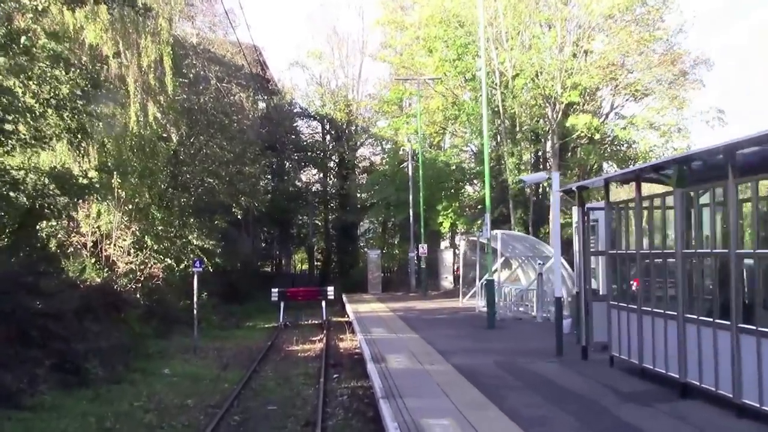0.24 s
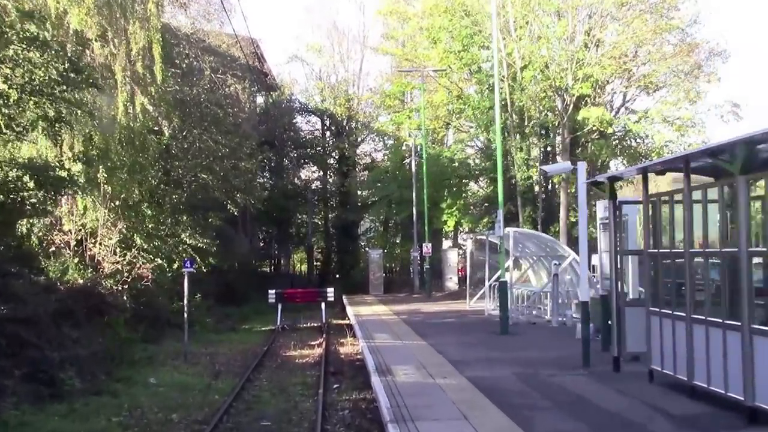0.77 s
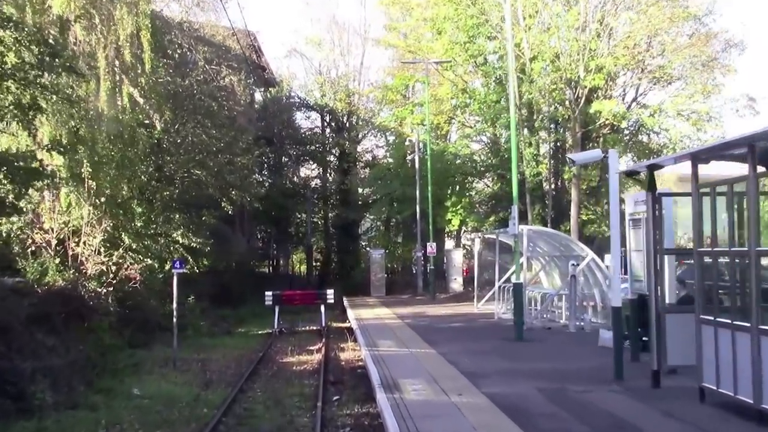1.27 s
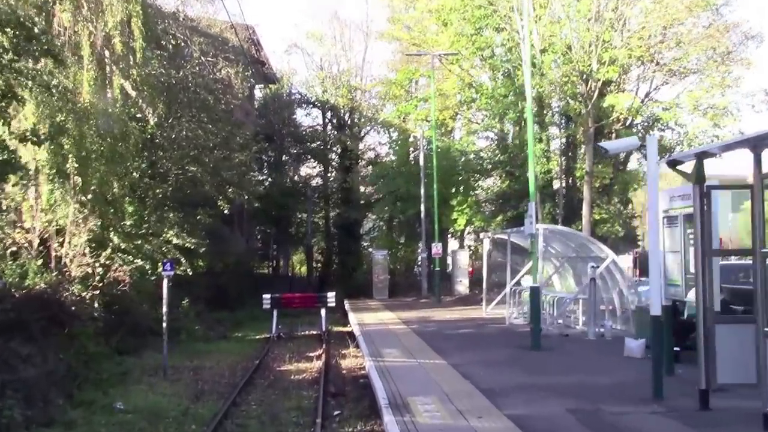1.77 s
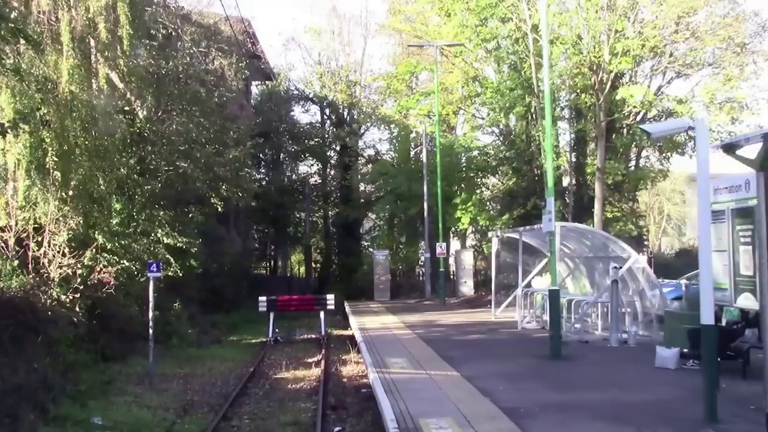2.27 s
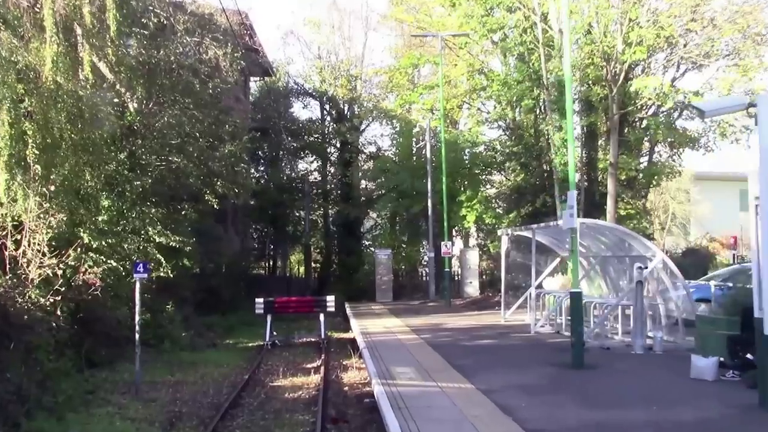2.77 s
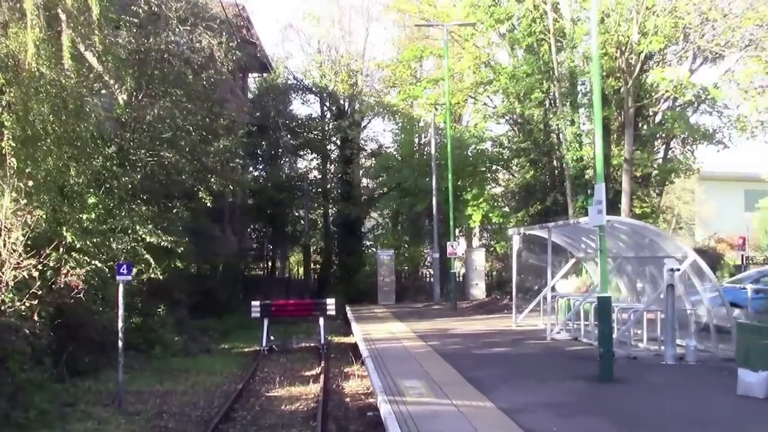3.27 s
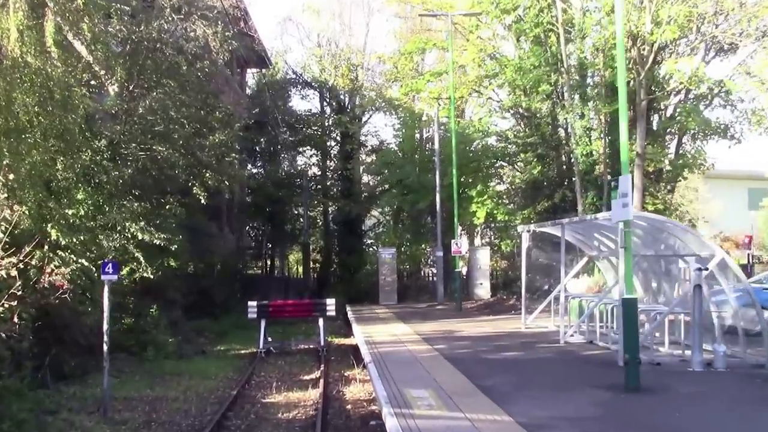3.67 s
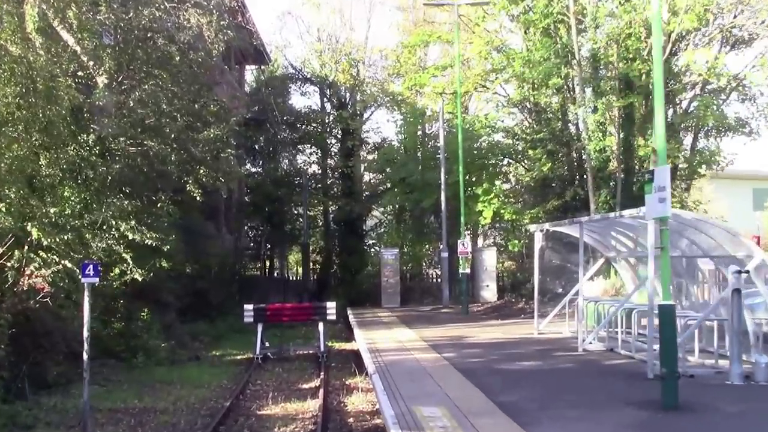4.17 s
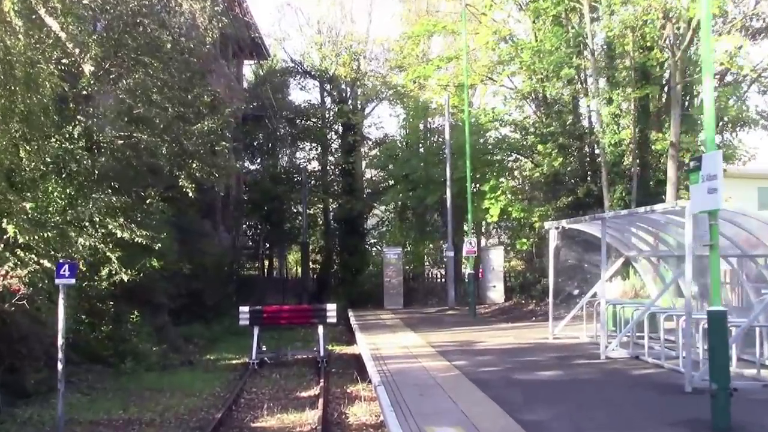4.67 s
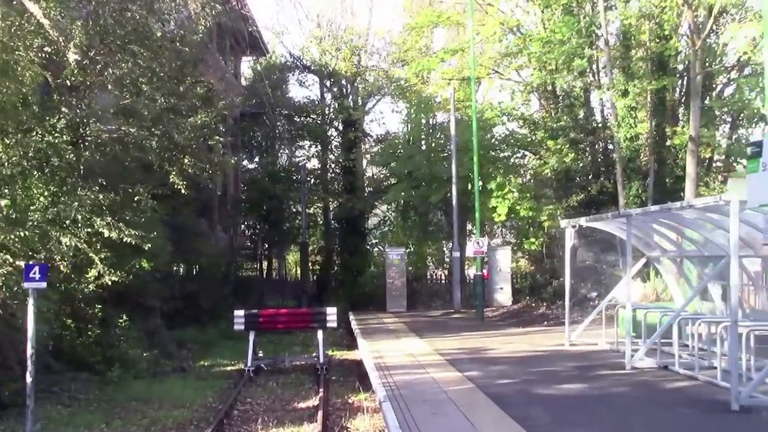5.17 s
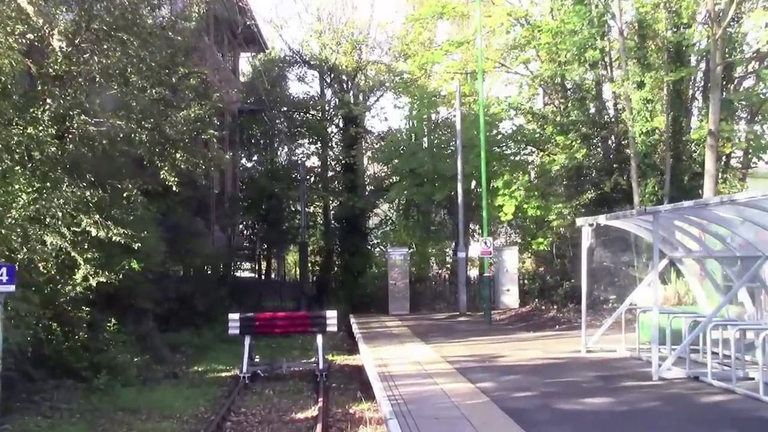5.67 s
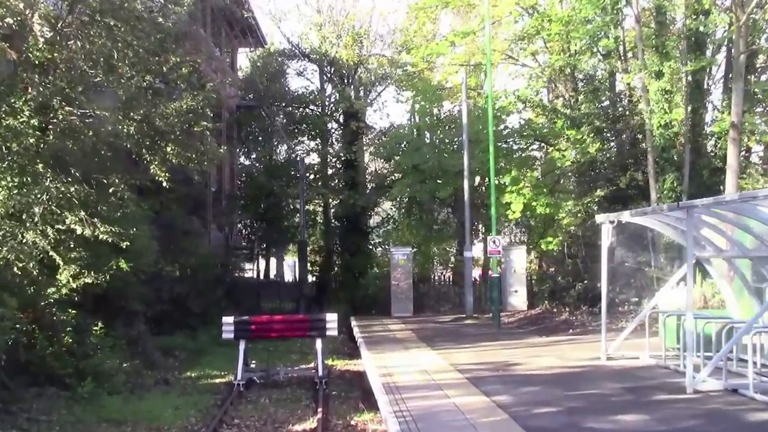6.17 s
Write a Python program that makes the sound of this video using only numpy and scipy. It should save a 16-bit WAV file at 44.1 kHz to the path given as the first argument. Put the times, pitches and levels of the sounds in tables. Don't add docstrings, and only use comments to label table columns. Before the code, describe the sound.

Inside the cab of an electric train creeping toward a halt beside a platform, captured in close, fairly centred stereo. Throughout, two motor-generators under the floor give a strong low hum around 200 hertz with fainter higher tones, above a lumpy bogie rumble, floor drumming and soft fan hiss. A thin, breathy brake whistle near 3 kilohertz comes and goes in short grips. A faint joint passes at 0.5 seconds; a tiny squeak follows around 0.8. From 1.2 the hum begins slowly beating; a low scrape passes near 1.4 and joints knock at 1.6 and 1.9. Around 2.1 the whistle sinks in pitch. The hardest thuds land at 2.9 and 3.8, dull and clustered. Then joints grow sparse, with one soft knock at 5.0. Small trim squeaks pass near 5.1 and 6.1, and an air valve puffs briefly at 5.7 beside a faint joint. Hum and whistle continue to the end, about 6.4.

```python
import sys
import numpy as np
from scipy import signal
from scipy.fft import rfft, irfft, next_fast_len
from scipy.io import wavfile
from scipy.ndimage import map_coordinates

SR = 44100
rng = np.random.default_rng(int(sys.argv[2]) if len(sys.argv) > 2 else 0)


def transcribe(u):
    v = np.clip(np.atleast_2d(u).T, -1, 1)
    q = np.round(v * 32767).astype(np.int16)
    wavfile.write(sys.argv[1], SR, q)


def ratio(d):
    e = np.asarray(d, float) / 20
    return 10 ** e


N = 284003


def unit(x):
    return x / np.sqrt(np.mean(x ** 2) + 1e-20)


def along(points, hz):
    f, v = np.transpose(points)
    return np.interp(np.log(hz + 1), np.log(f + 1), v)


def spectrum(points):
    return lambda hz: ratio(along(points, hz))


def band(c_hz, w_hz):
    return lambda hz: (hz * w_hz) ** 2 / ((c_hz ** 2 - hz ** 2) ** 2 + (hz * w_hz) ** 2)


def curve(rows):
    s, value = np.transpose(rows)
    return np.interp(np.arange(N) / SR, s, value)


def wobble(rate_hz):
    knots = rng.standard_normal(int(N * rate_hz / SR) + 4)
    return map_coordinates(knots, [np.arange(N) * rate_hz / SR])


def filtered(x, response):
    m = next_fast_len(x.shape[-1] + 8192)
    return irfft(rfft(x, m) * response(np.fft.rfftfreq(m, 1 / SR)), m)[..., :x.shape[-1]]


# (frequency [Hz], likeness [0-1])
LIKENESS = [(30, 1), (250, 1), (600, 0.98), (1100, 0.9), (3500, 0.8), (6000, 0.8), (12000, 0.84)]


def rush(gain, length=N):
    def turn(hz):
        return np.arccos(np.clip(along(LIKENESS, hz), -1, 1)) / 2

    def mid_side(hz):
        return gain(hz) * [np.cos(turn(hz)), np.sin(turn(hz))]

    mid, side = filtered(rng.standard_normal((2, length)), mid_side)
    return unit(np.array([mid + side, mid - side]))


def add(track, s, burst):
    part = track[:, round(s * SR):][:, :burst.shape[1]]
    part += burst[:, :part.shape[1]]


def blow(rise_s, t60_s):
    t = np.arange(SR // 2) / SR
    return (1 - np.exp(-t / rise_s)) * ratio(-60 * t / t60_s)


PANEL_ORDERS = (4, 8, 12, 20, 24, 46)
# (level [dB], twin's share [0-1], twin's offset [deg])
PANEL_TWIN = [(-18.5, 0.61, 198), (-42, .48, 15.5), (-44, .613, 262), (-54.5, 0.6, 279), (-51.5, 0.2, 120),
              (-57.5, 0.4, 241)]
# (left-right [dB], left lead [rad])
PANEL_SKEW = [(0, 0.022), (-1, 0.024), (1.5, 0.068), (-1.7, 0.13), (0.5, 0.083), (0.5, .15)]
# (multiple, level [dB])
STEADY_ORDERS = [(5, -47.5), (10, -53), (15, -52), (16, -58), (25, -67.5), (28, -65.5), (31, -68),
                 (32, -76), (34, -75.5), (35, -68), (36, -65.5), (40, -66), (41, -64), (44, -69.5),
                 (45, -61.5), (50, -66.5), (54, -74), (56, -69.5), (58, -70), (66, -68.5)]
# (time [s], shaft angle ahead [deg])
TWIN_SLIP = [(0.0, -7.6), (0.4, 3.3), (0.8, 0.0), (1.2, 2.9), (1.6, 18.9), (2.0, 35.3), (2.5, 49.4),
             (3.0, 55.5), (3.6, 64.6), (4.2, 77.4), (4.75, 85.3), (5.3, 99.3), (5.8, 105.5), (6.44, 106.1)]


def motor_generators():
    shaft_hz, hunt_hz = 51.497, .015
    angle = 2 * np.pi * np.cumsum(shaft_hz + hunt_hz * wobble(1.5)) / SR
    slip_deg = curve(TWIN_SLIP)
    tones = []
    for k, (db, share, deg), skew in zip(PANEL_ORDERS, PANEL_TWIN, PANEL_SKEW):
        twin = share * np.exp(1j * np.radians(k * slip_deg + deg))
        tones.append((k, ratio(db) * (1 + twin), skew))
    for k, db in STEADY_ORDERS:
        tones.append((round(k), ratio(db + 0.85 * wobble(2.984)), rng.normal(0, [.9, .12])))
    out = np.zeros((2, N))
    sides = np.array([[.5], [-.5]])
    for k, size, (lean_db, lead_rad) in tones:
        tone = np.sqrt(2) * size * np.exp(1j * (k * angle + rng.uniform(0, 2 * np.pi)))
        out += (ratio(lean_db * sides) * np.exp(1j * lead_rad * sides) * tone).real
    return out


# (time [s], level [dB])
ROUGHNESS = [(0, 0.5), (.8, -0.5), (1.3, 2), (1.8, 1.5), (2.3, -1.5), (3, 2), (3.4, -2), (3.9, 1.5),
             (4.3, -1.5), (6.44, -1)]
# (frequency [Hz], level [dB per Hz])
RUMBLE = [(15, -42), (35, -21), (50, -10), (62, -10.5), (85, 2.5), (100, -4.5), (120, 2.5), (150, 1.5),
          (175, -4.5), (260, -7), (400, -62.5)]
# (frequency [Hz], level [dB per Hz])
FLOOR_DRUM = [(100, -32), (200, 0.5), (240, 0), (300, -2.5), (360, -8), (480, -5.5), (580, -12.5),
              (700, -14.5), (900, -15), (1100, -24.5), (1500, -57.5)]


def rolling():
    rough_db = curve(ROUGHNESS)
    rumble_db = -44 + 1.8 * rough_db + 3.5 + 2.0 * wobble(10)
    drum_db = -38 + rough_db + 0.5 + 1.0 * wobble(11)
    return ratio(rumble_db) * rush(spectrum(RUMBLE)) + ratio(drum_db) * rush(spectrum(FLOOR_DRUM))


# (time [s], level [dB], centre [Hz])
JOINTS = [(.5, -37, 85), (1.12, -42, 600), (1.267, -42, 250), (1.42, -36, 429), (1.53, -35, 120),
          (1.63, -23.5, 248), (1.65, -30.5, 90), (1.894, -24.5, 290), (2.17, -30, 90), (2.439, -26.5, 130),
          (2.759, -30, 121.7), (2.888, -24, 602), (2.918, -16.5, 298), (2.929, -21, 150.5),
          (2.922, -26.5, 785), (2.945, -32.5, 620), (3.0, -29.5, 455), (3.757, -26.5, 612),
          (3.77, -19, 135), (3.785, -23.5, 444), (3.8, -19, 228), (3.8, -38, 880), (3.83, -29.5, 560),
          (3.859, -27.5, 332), (4.063, -39, 84), (4.18, -39, 145), (4.998, -32.5, 130), (5.77, -37.5, 119),
          (5.815, -36.5, 398), (6.277, -44, 392)]


def rail_joints():
    out = np.zeros((2, N))
    for s, db, c_hz in JOINTS:
        rise_s, t60_s = 2.2 / c_hz, 0.26 * (c_hz / 200) ** -.3
        w_hz = 0.51 * c_hz * (c_hz / 200) ** .25

        def gain(hz):
            dull = 1 / (1 + (hz / 950) ** 4)
            thin = 1 / (1 + (.45 * c_hz / (hz + 1)) ** 4)
            return band(c_hz, w_hz)(hz) * dull * thin

        shape = blow(rise_s, t60_s)
        thud = unit(shape * rush(gain, length=SR // 2))
        add(out, s, ratio(db) * thud * np.sqrt(np.mean(shape ** 2)))
    return out


# (start [s], length [s], level [dB], whistle [Hz])
BRAKE_GRIPS = [(0, .42, -57.5, 3290), (.5, .3, -59, 3240), (.98, .25, -60, 3335), (1.5, .15, -61, 3315),
               (1.82, .15, -57, 3270), (2.14, .35, -58, 3085), (2.63, .17, -59, 3095),
               (2.93, .22, -53.5, 3125), (3.18, .15, -61, 3250), (3.52, .22, -58, 3240),
               (3.85, .43, -57.5, 3100), (4.42, .33, -54.5, 3085), (4.8, .45, -57, 3100),
               (5.29, .27, -55.5, 3075), (5.8, .2, -57, 3100), (6.03, .45, -56.5, 3095)]


def brake():
    drag_db, edge_s = -64.5, 0.023
    t = np.arange(N) / SR
    effort = ratio(drag_db)
    held = []
    for s, span_s, db, hz in BRAKE_GRIPS:
        held += [(s, hz), (s + .8 * span_s, hz)]
        grip = np.clip(np.minimum(t - s, s + span_s - t) / edge_s + .5, 0, 1)
        effort = effort + (ratio(db) - ratio(drag_db)) * grip
    pitch_hz = curve(sorted(held))
    angle = 2 * np.pi * np.cumsum(pitch_hz + 10 * wobble(20) + 12 * wobble(5)) / SR

    def slow(w_hz):
        return unit(filtered(rng.standard_normal((2, N)), lambda hz: 1 / (1 + (hz / w_hz) ** 2)))

    smear = np.clip((pitch_hz - 3120) / 160, 0, 1)
    a, b = np.sqrt(1 - smear) * slow(48) + np.sqrt(smear) * slow(120)
    steady = 0.14 * (1 - smear)
    whistle = (a + steady) * np.sin(angle) + b * np.cos(angle)
    return effort * ratio(-1.0 + 0.52 * wobble(8.3)) * whistle


# (time [s], level [dB], length [s], centre [Hz], width [Hz])
TRIM_SQUEAKS = [
    (.77, -60, 0.068, 3890, 12),
    (1.382, -53, .3, 2420, 300),
    (4.14, -67, 0.074, 3900, 37),
    (4.43, -71, 0.048, 3820, 40),
    (5.1, -61, 0.068, 3940, 30),
    (5.41, -68.5, 0.057, 3900, 40),
    (5.743, -56.5, .05, 3970, 280),
    (6.12, -63, .11, 3860, 70),
]


def trim():
    out = np.zeros((2, N))
    for s, db, span_s, c_hz, w_hz in TRIM_SQUEAKS:
        swell = np.hanning(round(1.7 * span_s * SR))
        add(out, s - 0.87 * span_s, ratio(db) * swell * rush(band(c_hz, w_hz), length=len(swell)))
    return out


# (time [s], level [dB], rise [s], t60 [s])
VALVE_PUFF = (5.718, -54.5, .012, .22)
# (frequency [Hz], level [dB per Hz])
VALVE_AIR = [(2500, -28), (3800, -8), (4500, -4), (6000, 4), (7500, -7), (9200, -3.5), (10500, -6.5),
             (12000, -26), (15000, -29.5)]


def air_valve():
    out = np.zeros((2, N))
    s, db, rise_s, t60_s = VALVE_PUFF
    add(out, s, ratio(db) * blow(rise_s, t60_s) * rush(spectrum(VALVE_AIR), length=SR // 2))
    return out


# (frequency [Hz], level [dB per Hz])
FAN_HISS = [(300, -33), (800, -0.5), (1300, 0), (2000, -3.5), (2900, -5), (3400, -9), (3700, -10.5),
            (4500, -16.5), (6300, -18.5), (8500, -21.5), (10500, -29), (13000, -36.5), (16000, -47.5)]
# (centre [Hz], width [Hz], level [dB])
FAN_HOUSING = [(6310, 150, -3.5), (9200, 90, 0), (9200, 120, -4), (9450, 55, 0), (11040, 200, 5.5)]


def fan():
    def gain(hz):
        ring = sum(ratio(db) / (1 + (2 * (hz - c_hz) / w_hz) ** 2) for c_hz, w_hz, db in FAN_HOUSING)
        return spectrum(FAN_HISS)(hz) * (1 + ring)

    return ratio(-52.5 + 0.16 * wobble(7.8)) * rush(gain)


def scene():
    return motor_generators() + rolling() + rail_joints() + brake() + trim() + air_valve() + fan()


def band_limit(x):
    return signal.sosfilt(signal.butter(12, 15720, fs=SR, output="sos"), x)


def record(dry):
    lean_db = .22
    mix = dry * ratio([[lean_db], [-lean_db]])
    return band_limit(mix)


dry = scene()
out = record(dry)
transcribe(out)
```